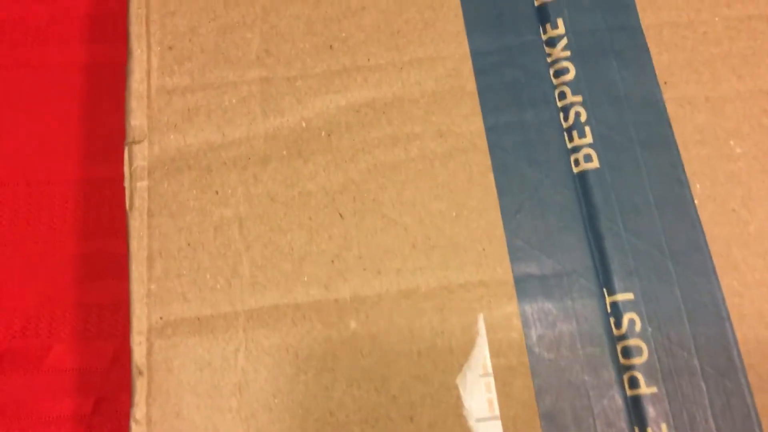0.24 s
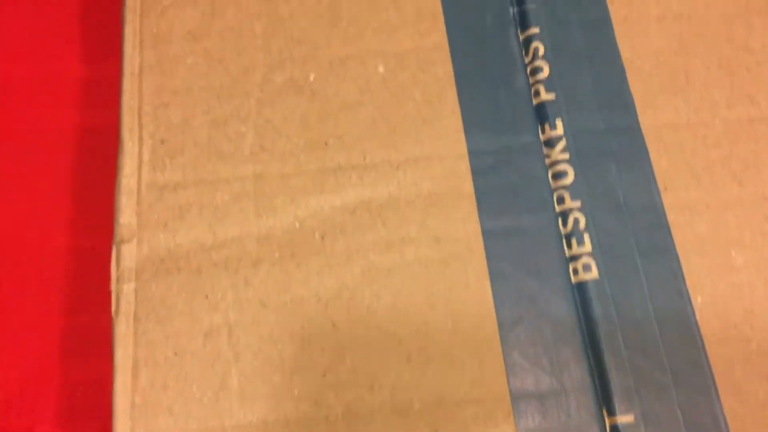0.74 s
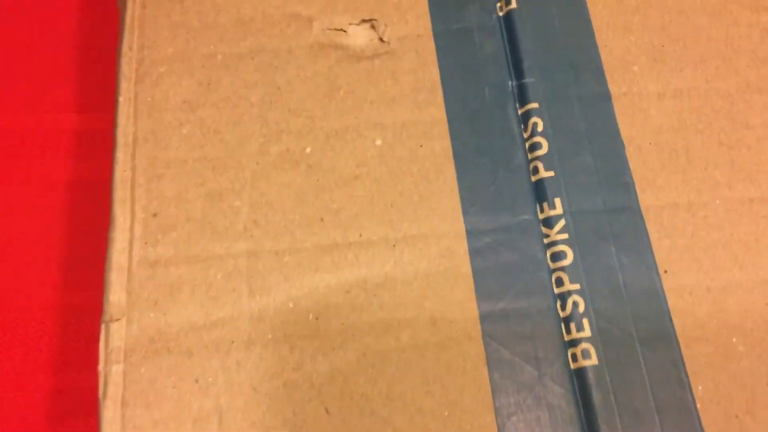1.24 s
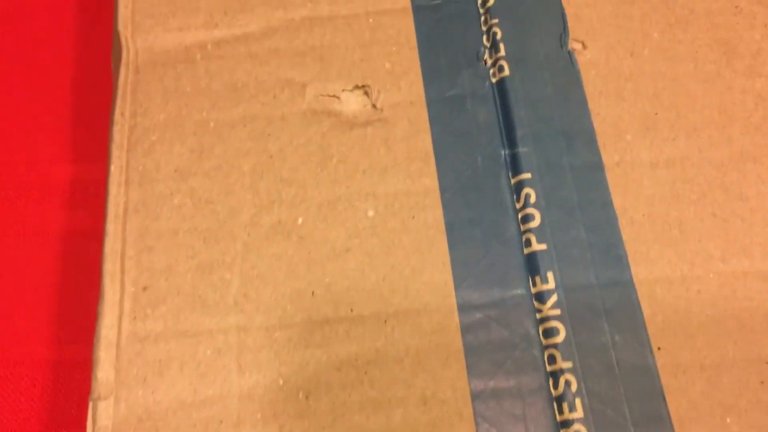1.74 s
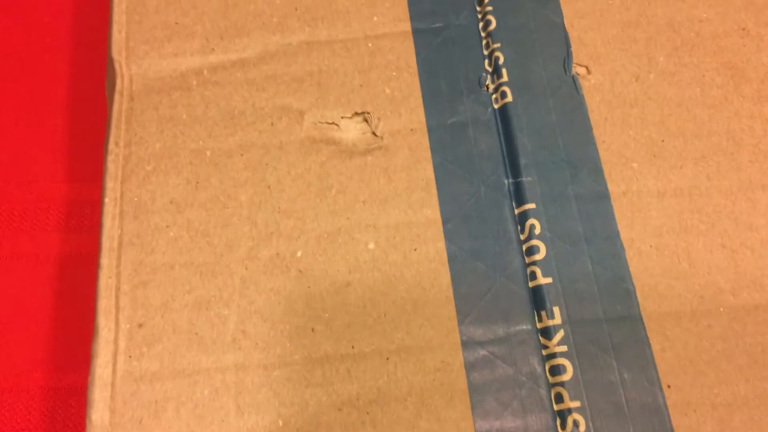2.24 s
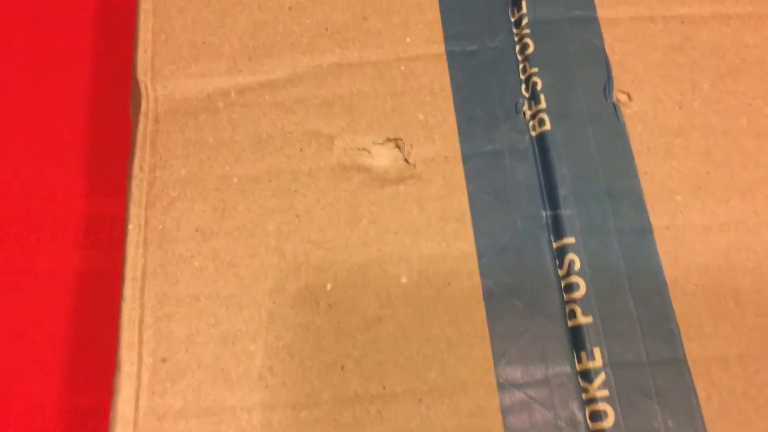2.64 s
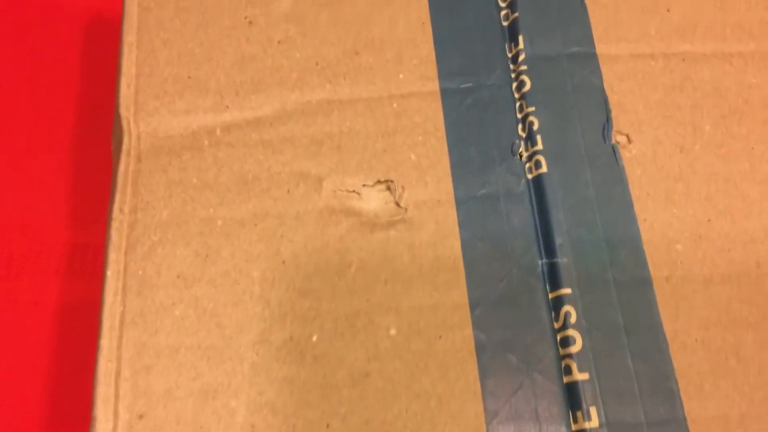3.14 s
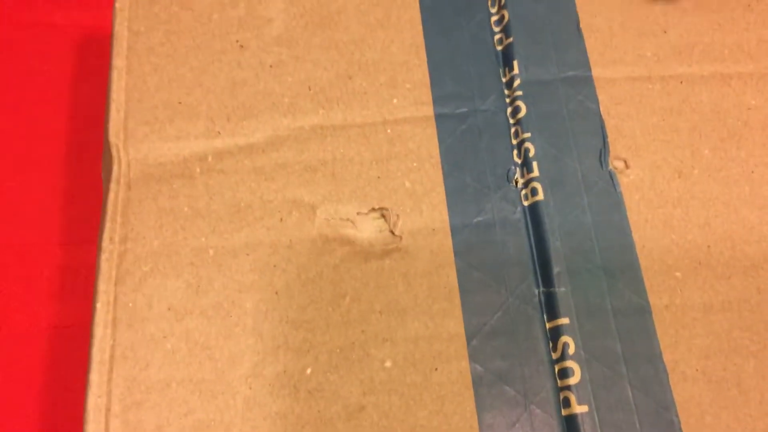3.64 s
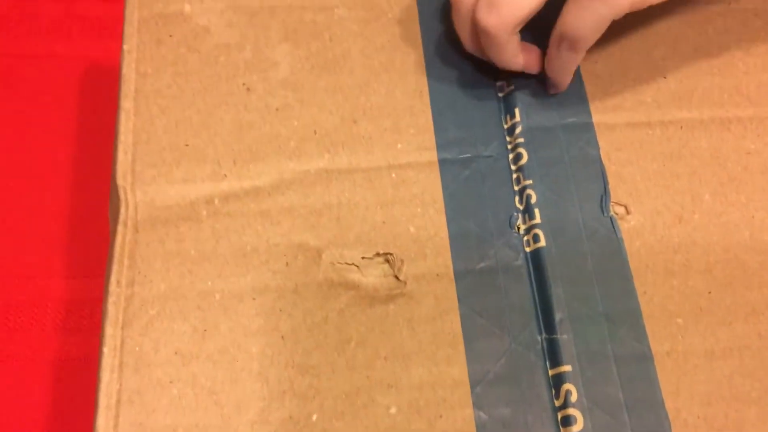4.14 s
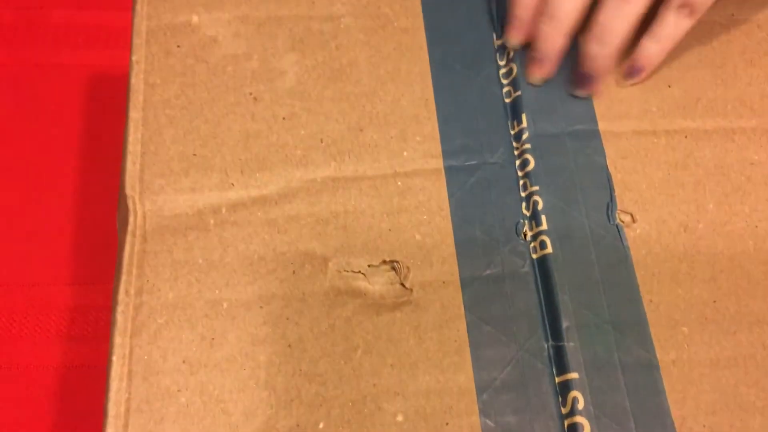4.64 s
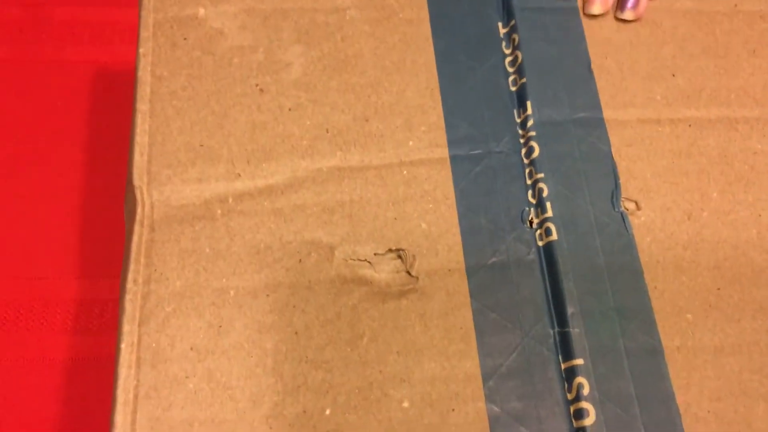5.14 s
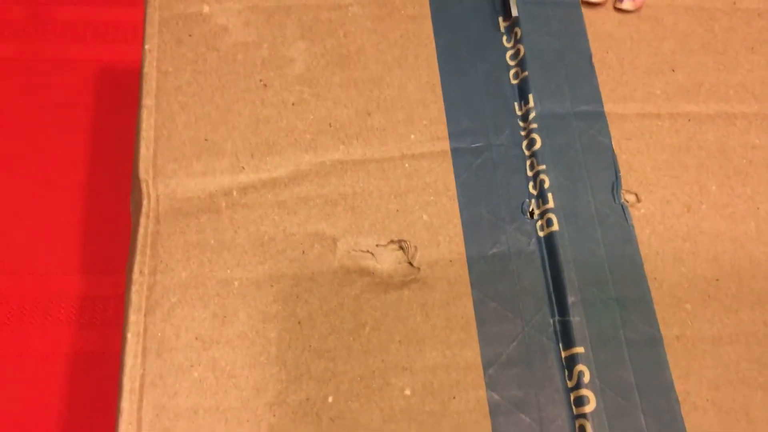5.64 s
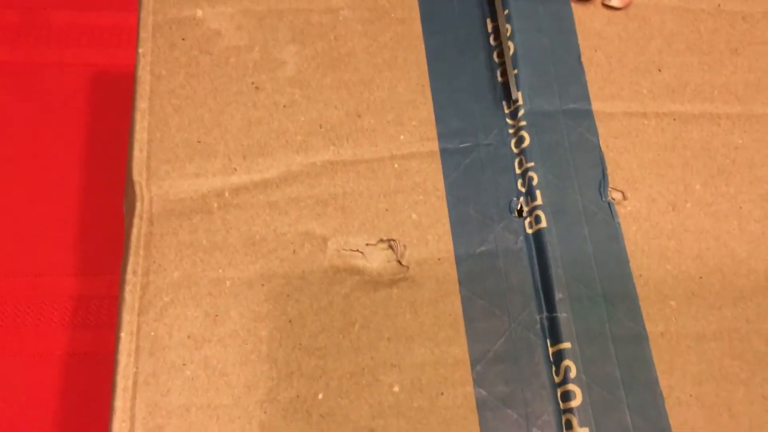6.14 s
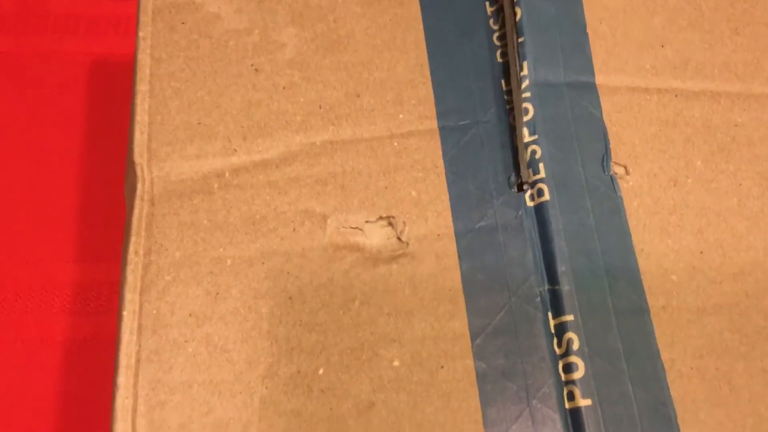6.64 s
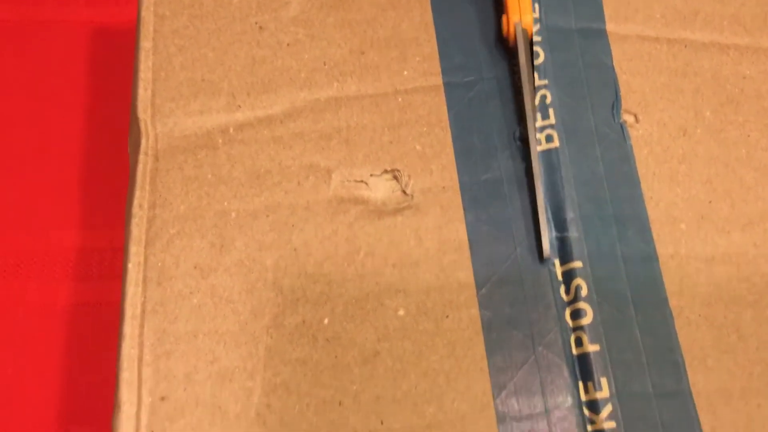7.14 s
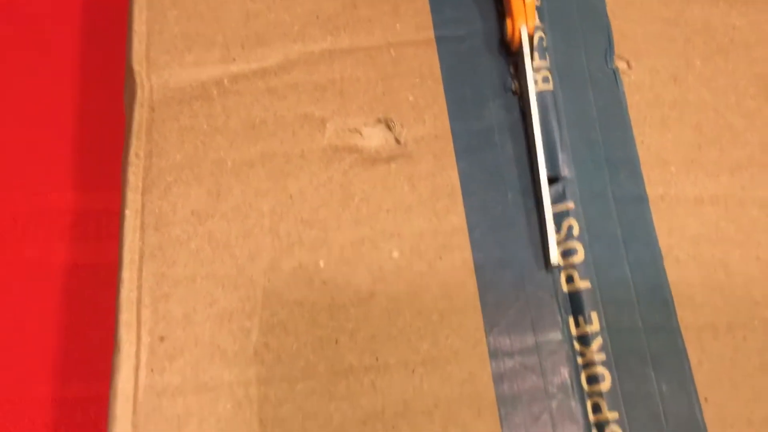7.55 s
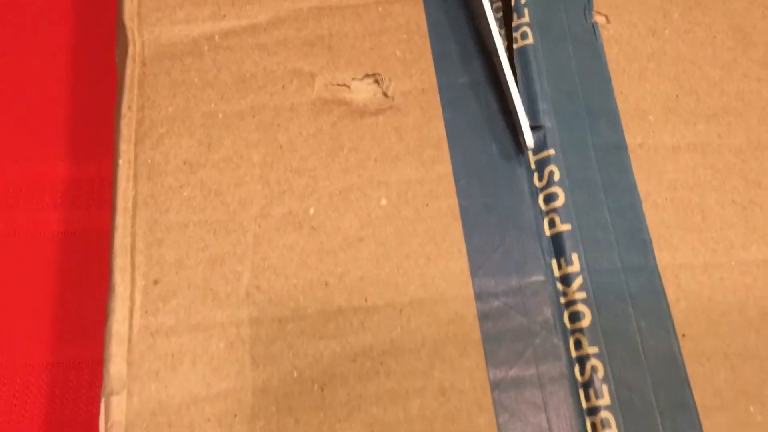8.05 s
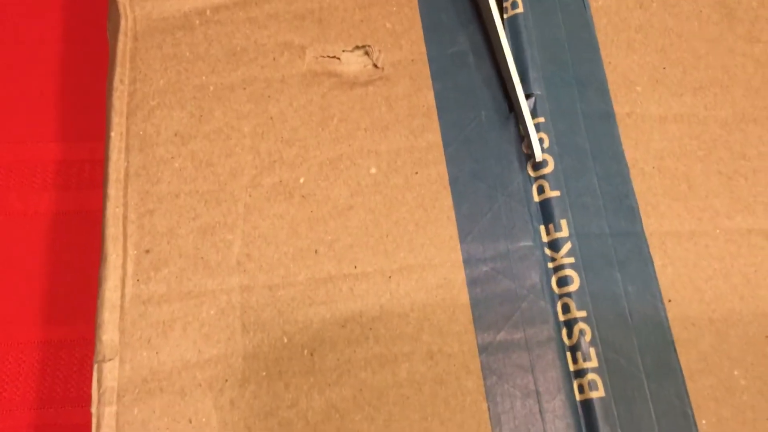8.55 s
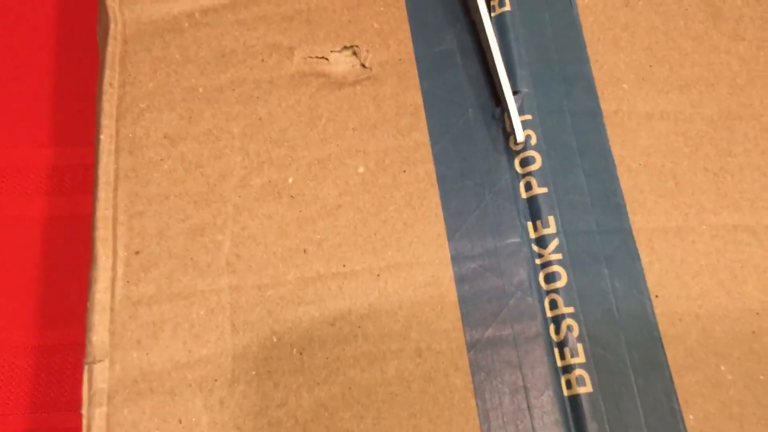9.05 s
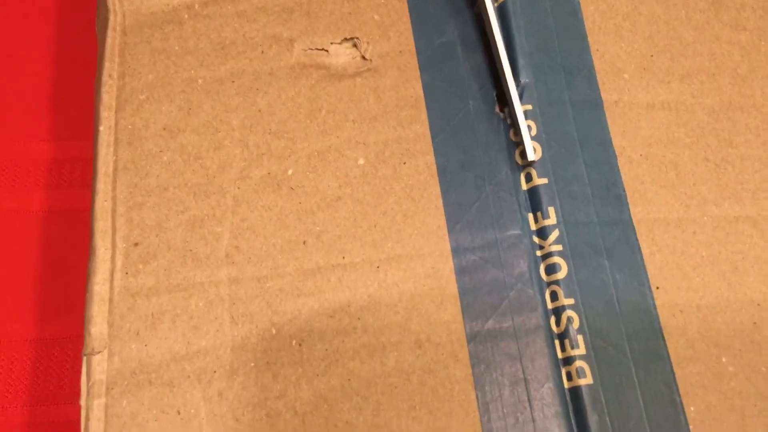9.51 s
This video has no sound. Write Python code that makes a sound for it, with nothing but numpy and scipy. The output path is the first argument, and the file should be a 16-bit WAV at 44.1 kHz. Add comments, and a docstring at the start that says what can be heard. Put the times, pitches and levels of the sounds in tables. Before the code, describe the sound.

In a small quiet room with a faint low hum, a hand bumps and brushes a hollow cardboard box, making dull thumps, soft rubs and small tape snaps. Past the middle, a scissor blade slits the tape in short coarse scrapes with loud cracks and boomy jolts, then smaller, quieter scratches and ticks. The microphone is very close, with a short soft room tail.

```python
"""In a small room with a faint hum, a taped cardboard box is handled, then slit along its seam.
Fingers bump and rub the lid: blows are falling chirps of bending waves, rubs are noise made of tiny slips.
A scissor blade slits the tape in short strokes of coarser friction, with squeaks of wavering tone and jolts.
Noise bursts make the tape snap and tick, and the ringing of the hollow lid booms under blows and strokes."""
import sys
import numpy as np
from scipy import signal
from scipy.fft import rfft, irfft
from scipy.io import wavfile
from scipy.ndimage import map_coordinates

SR = 44100
rng = np.random.default_rng(int(sys.argv[2]) if len(sys.argv) > 2 else 0)


def master(y):
    """Save y as 16-bit WAV."""
    cut = np.clip(np.atleast_2d(y).T, -1, 1)
    pcm = np.round(cut * 32767)  # scale
    wavfile.write(sys.argv[1], SR, pcm.astype(np.int16))


N = 431298
TIME = np.arange(N) / SR


def gain_of(db):
    """Decibels to amplitude."""
    return 10 ** (np.asarray(db) / 20)


def evened(x):
    """Scales to rms 1."""
    return x / np.sqrt(np.mean(x ** 2) + 1e-20)


def peaked(x, db):
    """Scales to a peak level."""
    return gain_of(db) * x / abs(x).max()


def read(points, hz):
    """Reads a table on a log-frequency axis."""
    f, value = np.transpose(points)
    return np.interp(np.log(hz + 1), np.log(f + 1), value)


def add(mix, s, sound):
    """Mixes a sound in at a time in seconds, trimming what falls outside."""
    start = round(s * SR)
    part, sound = mix[max(start, 0):], sound[max(-start, 0):]
    part[:len(sound)] += sound[:len(part)]


def band(x, low_hz, high_hz, order=2):
    """Causal band-pass."""
    edges = [low_hz, min(high_hz, SR / 2 - 1)]
    return signal.sosfilt(signal.butter(order, edges, "band", fs=SR, output="sos"), x)


def wander(per_s, size=N):
    """Random drift of about rms 1: straight lines between 2 * per_s random points a second."""
    at = TIME[:size] * per_s * 2
    knots = rng.standard_normal(int(at[-1]) + 40)
    # the root makes up for the level lost between points
    return map_coordinates(evened(knots), [at], order=1) * np.sqrt(3 / 2)


# Spectrum of the quiet room. Each row: frequency in Hz, relative density in dB per Hz.
AIR_COLOUR = [(15, -32), (25, -50), (40, -33), (64, -0.5), (87, -4.5), (123, -9.5), (145, -10), (180, -7.5),
              (206, -9), (285, -10.5), (531, -26.5), (2350, -30), (2990, -37), (4030, -40), (16000, -51.5)]
# Faint hum of a distant motor. Each row: frequency in Hz, rms level in dB.
MOTOR_HUM = [(57, -57), (120, -59)]
AIR_DB = -55.5


def background():
    """Soft ventilation noise, shaped in frequency, with a hum of sines whose phase wavers."""
    colour = gain_of(read(AIR_COLOUR, np.fft.rfftfreq(N, 1 / SR)))
    air = evened(irfft(rfft(rng.standard_normal(N)) * colour, N))
    hum = sum(gain_of(db) * evened(np.sin(2 * np.pi * hz * TIME + 1.64 * wander(5.1)))
              for hz, db in MOTOR_HUM)
    return gain_of(AIR_DB) * air * gain_of(0.24 * wander(4.5)) + hum


def room(x, gap_s=0.00156):
    """A short, soft noise tail from nearby walls and furniture, with its own decay at each frequency."""
    t = TIME[:SR // 2]
    hz, at, z = signal.stft(rng.standard_normal(len(t)), SR, nperseg=256)
    # each pair: frequency in Hz, seconds to fall 60 dB
    t60 = read([(120, 0.24), (600, 0.32), (4000, 0.23), (12000, 0.22)], hz)
    tail = signal.istft(z * gain_of(-60 * at / t60[:, None]), SR, nperseg=256)[1]
    tail = tail[:len(t)] * (t > gap_s)
    return signal.fftconvolve(x, tail / np.linalg.norm(tail))[:N]


# Spells of faint ticking tape. Each row: start in seconds, end in seconds, ticks per second,
# middling peak level in dB.
TAPE_TICKS = [(4.0, 5.8, 16, -51), (7.45, 9.7, 16, -52.5)]


def ticks(spread_db=4, tick_s=0.0014, size=500):
    """Tiny bright noise ticks at random moments as the stressed tape lets go here and there."""
    out = np.zeros(N)
    for start, end, per_s, db in TAPE_TICKS:
        levels = gain_of(db + spread_db * rng.uniform(-1.5, 1, N))
        clicks = (rng.random(N) < per_s / SR) * levels * (TIME > start) * (TIME < end)
        tick = band(rng.standard_normal(size) * np.exp(-TIME[:size] / tick_s), 8100, 15500)
        out += signal.oaconvolve(clicks, tick / abs(tick).max())[:N]
    return out


# Ringing modes of the lid over the hollow box. Each row: frequency in Hz, relative level in dB,
# seconds to fall 60 dB.
LID_MODES = [(86.5, -7.5, 0.32), (127.7, -1, 0.067), (165.4, -1.5, 0.14), (200.6, -2, 0.12),
             (276, -26, 0.049), (312.6, 0.5, 0.12), (405.5, -9.5, 0.17), (502, -9.5, 0.1), (610, -6, 0.042),
             (749, -1.5, 0.076), (1250, -31, 0.044), (1440, -27, .05), (2150, -30, .025)]


def lid_ring(t):
    """The lid's modes after a unit push, a little different at every spot."""
    hz, db, t60 = np.transpose(LID_MODES)[:, :, None]
    spot = rng.standard_normal((len(LID_MODES), 1))
    return (gain_of(db + 0.54 * spot - 60 * t / t60) * np.sin(2 * np.pi * hz * t)).sum(0)


# Blows on the lid. Each row: time in seconds, then peak levels in dB of the low thump, the middle knock
# and the upper clack, then thump frequency in Hz.
LID_BLOWS = [(0.064, -32.5, -46, -48, 130), (0.602, -48, -41.5, -47, 112), (1.09, -31.5, -57, -49, 99),
             (1.723, -20, -36, -42.5, 170), (2.241, -13.5, -23.5, -29, 243), (2.459, -33, -52, -43, 170),
             (2.555, -25.5, -40.5, -34.5, 120), (2.924, -27.5, -43, -47, 160),
             (3.125, -18, -19, -22.5, 382), (3.308, -28.5, -40.5, -38.5, 166),
             (3.884, -19, -24, -29.5, 128), (4.71, -40, -41, -42, 123), (5.065, -20, -29.5, -30, 157),
             (5.301, -29.5, -59, -52, 169), (6.34, -25, -55, -46, 113), (6.884, -15.5, -20.5, -16, 207),
             (7.214, -11.5, -27.5, -16, 160), (7.242, -20, -31, -32, 163), (7.847, -25, -47, -34, 156),
             (8.007, -25.5, -57, -32, 131), (8.15, -32, -44.5, -55, 161), (8.592, -35.5, -37.5, -36.5, 131),
             (8.911, -28.5, -42, -35.5, 132), (9.069, -34, -48, -43, 164), (9.136, -34, -42, -43.5, 278),
             (9.388, -37, -32, -44, 119), (9.63, -43, -43, -32.5, 220), (9.704, -34, -70, -63, 193),
             (9.73, -30.5, -50, -38.5, 144)]


def knocks(bend_s=0.0099, ring=0.01, echo_s=0.01031, scatter=0.14, scatter_t60=0.026,
           sharpness=2.4, size=16384):
    """Bending waves in cardboard run faster the higher they are, so each blow is a quick falling chirp."""
    out, t, hz = np.zeros(N), np.arange(size) / SR, np.fft.rfftfreq(size, 1 / SR)
    lead = size // 64  # samples kept free ahead of the blow
    # the delay is bend_s at 125 Hz and falls with the root of frequency
    travel = np.exp(-4j * np.pi * bend_s * np.sqrt(125 * hz))
    # soft crossovers between thump, knock and clack
    above_thump, above_knock = np.clip(np.log2((hz + 1) / np.array([[330], [850]])) * 1.7 + .5, 0, 1)
    knock = (above_thump - above_knock) / np.hypot(1, 0.95 * (hz / 500 - 500 / (hz + 1)))
    clack = above_knock / (1 + (hz / 2700) ** 4) / (1 + hz / 1100)
    for s, *levels, thump_hz in LID_BLOWS:
        detune = sharpness * (hz / thump_hz - thump_hz / (hz + 1))
        thump = (1 - above_thump * 0.95) * (1 - above_knock) / (1 + detune ** 2) ** 0.54
        thump = thump * hz ** 2 / (hz ** 2 + 55 ** 2)  # the lid is too small to radiate deep bass
        # one dull echo back from the box edge
        delay = echo_s * rng.uniform(0.754, 1.171)
        echo = np.exp(-2j * np.pi * hz * delay) / (1 + (hz / 600) ** 2)
        diffuse = rfft(scatter * rng.standard_normal(size) * gain_of(-60 * t / scatter_t60))
        diffuse = diffuse / np.hypot(1, hz / 1100)
        wave = travel * (1 + echo + diffuse + rfft(ring * lid_ring(t)))
        parts = [np.roll(irfft(wave * shape), lead) for shape in (thump, knock, clack)]
        add(out, s - lead / SR, sum(peaked(part, db) for part, db in zip(parts, levels)))
    return out


# Snaps of tape and ticks of nail or steel. Each row: time in seconds, crack level in dB (total energy),
# brightness in dB (the fizz is this far above the crack, the body as far below).
TAPE_SNAPS = [(0.5885, -29, -1.5), (1.505, -27, -6), (1.6503, -24.5, -7), (2.072, -20.5, -1.5),
              (2.2363, -23, -4), (2.915, -41, -4), (3.1262, -12, -4), (3.8871, -28, -1),
              (3.9527, -22, -5.5), (3.9852, -25, -5.5), (4.2046, -40, 2), (4.4433, -34.5, -1),
              (4.715, -26, -4.5), (4.8236, -29, -5), (5.0658, -14.5, -4), (5.591, -20, 0),
              (5.6011, -8, -0.5), (5.6503, -26, -10), (5.7985, -28, -3.5), (5.887, -17, -4),
              (6.0293, -18, -4.5), (6.064, -23, -5.5), (6.32, -16.5, -2), (6.4183, -15.5, -1),
              (6.463, -18.5, -2), (6.6279, -31.5, -15.5), (6.8272, -14.5, -1.5), (6.8855, -2.5, -7.5),
              (7.0388, -11, -0.5), (7.2146, -12.5, 4), (7.2425, -14, 1), (7.444, -43, 10),
              (7.8511, -31, -11), (7.949, -32.5, -7), (8.011, -32, -10), (8.208, -36, 3), (8.491, -36, -1),
              (8.532, -38.5, -6), (8.5874, -36.5, 6.5), (8.7025, -25, 3.5), (8.775, -41, 5),
              (8.9035, -29, 1), (8.9142, -25, 9.5), (8.9368, -27.5, -6), (9.247, -39.5, 13.5),
              (9.5989, -34, -7), (9.6303, -32.5, 1), (9.653, -29.5, -7)]


def snaps(crack_s=0.0016, rustle=0.24, rustle_s=0.0078, strain=0.073, strain_s=0.0087, size=3400):
    """The film creaks for an instant under strain, cracks, then shivers for a few milliseconds."""
    out, t = np.zeros(N), (np.arange(size) - size // 8) / SR
    creak = strain * np.exp(-abs(t) / strain_s)
    crack = np.exp(-abs(t) / crack_s) + rustle * np.exp(-abs(t) / rustle_s)
    shape = np.where(t < 0, creak, crack)
    for s, crack_db, bright_db in TAPE_SNAPS:
        burst = rng.choice([-1, 1], size) * shape
        # body, crack and fizz
        parts = band(burst, 1150, 2380), band(burst, 3330, 6740, order=3), band(burst, 5900, 13800)
        levels = crack_db - bright_db, crack_db, crack_db + bright_db
        add(out, s + t[0], sum(gain_of(db) * part / np.linalg.norm(part)
                               for part, db in zip(parts, levels)))
    return out


def resonate(x, hz, width):
    """A resonance of gain 1, width in Hz, that follows a pitch curve by turning it down to 0 Hz."""
    turn = np.exp(2j * np.pi * np.cumsum(hz * np.ones(len(x))) / SR)
    r = np.exp(-np.pi * width / SR)
    return 2 * (turn * signal.lfilter([1 - r], [1, -r], x / turn)).real


# Waves sent back by creases and flap edges. Each row: delay in seconds, echo level in dB.
CREASE_ECHOES = [(.00038, -12), (.00071, -10.5), (.00125, -3.5), (.0023, -9.5), (.0047, -6)]


def contact(x, flap_hz, flap_db, film_db, flap_width=720, film_hz=9700, film_width=900,
            overtone=2.01, overtone_db=-3, stretch=0.22, sweeps_per_s=1.5):
    """Colours friction by where it happens: echoes glide as the contact moves, the flap and the film ring."""
    t, path = TIME[:len(x)], 1 + stretch * wander(sweeps_per_s, size=len(x))
    x = x + sum(gain_of(db) * np.interp(t - delay * path, t, x) for delay, db in CREASE_ECHOES)
    flap = resonate(x, flap_hz, flap_width)
    flap = flap + gain_of(overtone_db) * resonate(x, overtone * flap_hz, flap_width)
    return x + gain_of(flap_db) * flap + gain_of(film_db) * resonate(x, film_hz, film_width)


STROKE_SIZE = 3 * 2 ** 13  # samples
STROKE_HZ = np.fft.rfftfreq(STROKE_SIZE, 1 / SR)
# Pitch at which the lid booms under hand or blade, higher near its stiff edges.
# Each row: time in seconds, frequency in Hz.
BOOM_PITCH_CURVE = [(0.1, 130), (1.9, 175), (2.9, 170), (3.55, 340), (5.25, 290), (5.9, 124), (7.1, 110),
                    (7.8, 181), (9.4, 161.6)]


def friction(s, colour_db, flap_hz, flap_db, film_db, slips_per_s, spread_db, catch_db, catches_per_s,
             smooth, snag, snag_hiss, snags_per_s, ring, boom_sharpness=1.52):
    """Tiny slips, bunched where the surface catches, heard as mid rasp, lid boom and high hiss."""
    n, f = STROKE_SIZE, STROKE_HZ
    sizes = gain_of(spread_db * np.minimum(rng.exponential(1, n), 4))
    slips = (rng.random(n) < slips_per_s / SR) * rng.choice([-1, 1], n) * sizes
    catches = gain_of(catch_db * wander(catches_per_s, size=n))
    drive = (evened(slips) + smooth * rng.standard_normal(n)) * catches
    sound = rfft(contact(drive, flap_hz, flap_db, film_db)) * gain_of(colour_db)
    # single fibres break with a coarser crackle
    snags = evened((rng.random(n) < snags_per_s / SR) * rng.uniform(-0.91, 1, n) ** 3)
    crackle = rfft(snags) * gain_of(colour_db)
    boom_hz = np.interp(s, *np.transpose(BOOM_PITCH_CURVE))
    lid = 1 + ring * sum(gain_of(db) / (1 + ((f - hz) * t60 / 1.06) ** 2) for hz, db, t60 in LID_MODES)
    lid = lid / np.hypot(1, boom_sharpness * np.log((f + 1) / boom_hz))
    # crossovers at 420 and 5500 Hz
    low, high = 1 / (1 + (f / 420) ** 4), 1 - 1 / (1 + (f / 5500) ** 6)
    rasp = (sound + snag * crackle) * (1 - low) * (1 - high)
    boom = sound * low * lid
    hiss = (sound + snag_hiss * crackle) * high
    return [irfft(part) for part in (rasp, boom, hiss)]


def stroke_time(swell_s, ease_s):
    """Seconds from the hardest press of a stroke."""
    return TIME[:STROKE_SIZE] - TIME[STROKE_SIZE] * swell_s / (swell_s + ease_s)


def stroke(s, swell_s, ease_s, levels_db, layers, drop_db, curve):
    """One stroke presses to full level and eases off; it is drop_db down a swell before and an ease after."""
    t = stroke_time(swell_s, ease_s)
    pressure = gain_of(-drop_db * abs(t / np.where(t < 0, swell_s, ease_s)) ** curve)
    mixed = sum(gain_of(db) * evened(x * pressure) for x, db in zip(layers, levels_db))
    # levels hold at the hardest press
    return s + t[0], mixed * np.sqrt(np.mean(pressure ** 2))


# Friction colour of skin. Each row: frequency in Hz, relative density in dB per Hz.
SKIN_COLOUR = [(29, -51), (50, -12), (85, -6), (175, -2.5), (246, -6), (661, -20), (729, -18.5),
               (1120, -24.5), (1470, -20.5), (1700, -30), (2210, -25), (3580, -34.5), (7390, -47.5),
               (9180, -44.5), (16000, -55)]
# Rubs of the hand. Each row: time of the hardest press in seconds, swell in seconds, ease in seconds,
# then rms levels at that press in dB of rasp, lid boom and hiss, flap frequency in Hz, flap gain in dB.
HAND_RUBS = [(.03, 0.051, .09, -63.5, -42.5, -78, 1450, 4),
             (.19, 0.031, 0.058, -64.5, -49.5, -78, 1450, -4), (.6, 0.046, .02, -52, -51.5, -71, 1400, -18),
             (1.485, 0.12, 0.063, -59, -62, -81, 2200, 4), (1.646, 0.048, 0.03, -56, -69, -70, 1400, 7),
             (1.85, 0.016, 0.072, -48.5, -42, -61, 1530, -2),
             (2.07, 0.06, .03, -49.5, -38.5, -69, 1490, -22),
             (2.46, 0.038, 0.087, -61.5, -46.5, -76, 1500, -1),
             (2.559, 0.032, 0.091, -53.5, -41, -62, 1490, -13),
             (2.78, .015, 0.075, -48.5, -37, -61.5, 1400, 2),
             (2.92, 0.025, 0.033, -41, -32.5, -55.5, 1460, -1),
             (3.389, 0.031, 0.077, -60.5, -53, -71, 1976, -8),
             (3.535, 0.049, .05, -46.5, -52, -54.5, 2330, 2),
             (3.585, 0.031, .018, -47.5, -52, -56.5, 2330, 1),
             (3.94, 0.054, 0.12, -47.5, -43.5, -62, 1520, -17),
             (4.16, 0.034, 0.11, -60.5, -69, -70, 2300, -5),
             (4.285, 0.035, .1, -50.5, -54.5, -60, 2300, -24),
             (4.48, .05, 0.14, -60.5, -53.5, -71, 1600, -17),
             (4.65, .025, 0.063, -49, -59.5, -62, 1820, -1),
             (4.84, 0.042, 0.071, -49.5, -59, -64, 1900, -1),
             (4.955, 0.049, 0.032, -51, -59, -65.5, 1500, 4), (5.129, .025, .06, -53, -50, -67, 1500, 3),
             (5.25, 0.072, .085, -43.5, -48, -55, 1750, 19),
             (5.365, .04, 0.031, -45.5, -42.5, -52, 1800, 15)]


def hand():
    """Skin and nails brush over card and tape, a fairly smooth friction."""
    out, colour_db = np.zeros(N), read(SKIN_COLOUR, STROKE_HZ)
    for s, swell_s, ease_s, *levels_db, flap_hz, flap_db in HAND_RUBS:
        layers = friction(s, colour_db, flap_hz, flap_db, film_db=-20, slips_per_s=1800, spread_db=2.5,
                          catch_db=3.5, catches_per_s=80, smooth=0.94, snag=1.0, snag_hiss=0.45,
                          snags_per_s=130, ring=0.92)
        add(out, *stroke(s, swell_s, ease_s, levels_db, layers, drop_db=10.5, curve=1.46))
    return out


# Stick-slip squeaks. Each row: time of the middle in seconds, length in seconds, pitch in Hz,
# rms level at the middle in dB.
SQUEAK_TONES = [(2.556, 0.028, 1490, -47), (2.916, 0.012, 1450, -34.5), (4.965, 0.026, 1380, -51),
                (6.205, 0.083, 1514, -54.5), (7.874, .016, 2133, -27), (7.876, 0.04, 2710, -40.5)]


def squeaks(waver=0.064):
    """Now and then the slips lock into a short tone, hoarse from its fast random waver in pitch."""
    out, drift = np.zeros(N), wander(420)
    for s, length, hz, db in SQUEAK_TONES:
        near = abs(TIME - s) < 2 * length
        swell = np.exp(-(2 * (TIME[near] - s) / length) ** 2)
        tone = swell * np.sin(2 * np.pi * np.cumsum(hz * (1 + waver * drift[near])) / SR)
        out[near] += gain_of(db) * tone * np.linalg.norm(swell) / np.linalg.norm(tone)
    return out


# Friction colour of the blade. Each row: frequency in Hz, relative density in dB per Hz.
BLADE_COLOUR = [(29, -65), (50, -20), (125, -5.5), (155, -14.5), (313, -9.5), (345, -16), (398, -10),
                (601, -14), (711, -18.5), (863, -14.5), (1180, -18), (2060, -19), (7040, -37.5),
                (9870, -31.5), (16000, -43)]
# Dips in the friction colour of the steel blade on stretched tape. Each row: frequency in Hz, width in Hz,
# change at the centre in dB.
BLADE_EDGE = [(1670, 190, -10), (3680, 1200, -2), (10080, 840, -6)]
# Pushes of the blade. Each row: time of the hardest press in seconds, swell in seconds, ease in seconds,
# then rms levels at that press in dB of rasp, lid boom and hiss, flap frequency at that press in Hz,
# flap gain in dB.
BLADE_CUTS = [(5.602, 0.0098, 0.045, -35.5, -35.5, -45, 2170, 9),
              (5.8, .14, 0.11, -51.5, -56, -61, 1910, 20), (5.9, .012, 0.035, -33.5, -35, -42, 1960, 20),
              (5.965, 0.053, 0.085, -37.5, -36.5, -45, 1926, 4.5),
              (6.28, .14, .045, -44, -39, -52.5, 1530, 14), (6.34, .018, .125, -37.5, -33, -43, 1920, 1),
              (6.48, 0.027, .15, -48.5, -44, -53, 2080, 5),
              (6.769, 0.072, 0.035, -50.5, -63, -62, 2000, -15),
              (6.835, .045, .06, -42, -36.5, -43, 2000, -8), (6.93, 0.044, 0.15, -42, -34, -45, 4150, 6),
              (7.19, 0.17, 0.073, -39.5, -34, -47, 2270, 7),
              (7.26, .02, 0.088, -46.5, -45, -55.5, 2180, -17),
              (7.45, 0.012, .04, -61.5, -51, -66, 2230, -20),
              (7.655, 0.063, .1, -42.5, -40.5, -52, 2500, -10),
              (7.865, 0.072, 0.076, -42.5, -40.5, -54.5, 2300, 1),
              (8.015, .012, .035, -38, -34, -48, 2280, 10), (8.07, 0.037, .06, -45.5, -41, -50, 2770, 2),
              (8.41, 0.066, 0.036, -49.5, -45, -55, 2700, -7),
              (8.65, 0.16, 0.063, -61, -55.5, -72, 2600, -17),
              (9.035, .028, 0.06, -52.5, -54, -54.5, 2750, 7),
              (9.245, 0.13, 0.047, -58.5, -50.5, -66.5, 2680, -18),
              (9.385, 0.068, .07, -46.5, -41, -55.5, 2660, -10)]


def blade(sag_octaves_per_s=1.0):
    """The edge tears the film and grinds along the flaps; their pitch sags in each stroke as the slit grows."""
    out, colour_db = np.zeros(N), read(BLADE_COLOUR, STROKE_HZ)
    colour_db = colour_db + sum(db / (1 + (2 * (STROKE_HZ - hz) / width) ** 2)
                                for hz, width, db in BLADE_EDGE)
    for s, swell_s, ease_s, *levels_db, flap_hz, flap_db in BLADE_CUTS:
        pitch_hz = flap_hz * 2 ** (-sag_octaves_per_s * stroke_time(swell_s, ease_s))
        layers = friction(s, colour_db, pitch_hz, flap_db, film_db=-3, slips_per_s=3000, spread_db=2.5,
                          catch_db=3.0, catches_per_s=100, smooth=0.56, snag=1.04, snag_hiss=0.41,
                          snags_per_s=160, ring=0.69)
        add(out, *stroke(s, swell_s, ease_s, levels_db, layers, drop_db=10.5, curve=1.77))
    return out


def scene():
    """Blows and friction close to the microphone, with the room behind them."""
    blows = knocks() + snaps() + ticks()
    scrapes = hand() + blade() + squeaks()
    tail = room(gain_of(-11.5) * blows + gain_of(-15.5) * scrapes)
    return (blows + scrapes + tail + background())[None]


TOP_HZ = 16100


def record(dry):
    """The recorder's band limit: a steep low-pass at TOP_HZ."""
    low_pass = signal.firwin(401, TOP_HZ, window=("kaiser", 8), fs=SR)
    return signal.oaconvolve(dry, low_pass[None], "same")


dry = scene()
out = record(dry)
master(out)
```